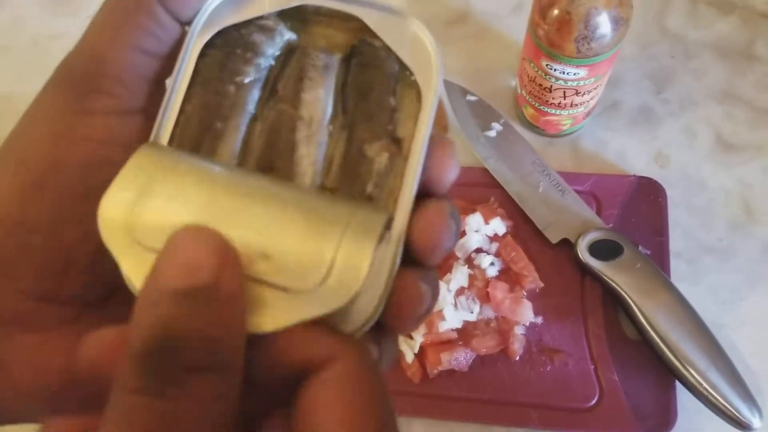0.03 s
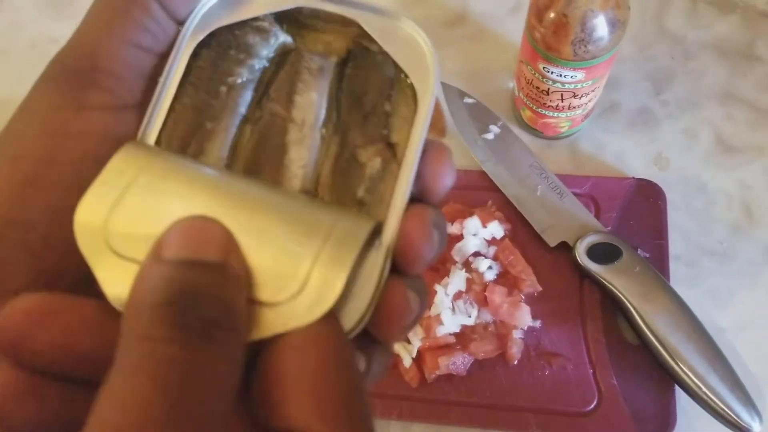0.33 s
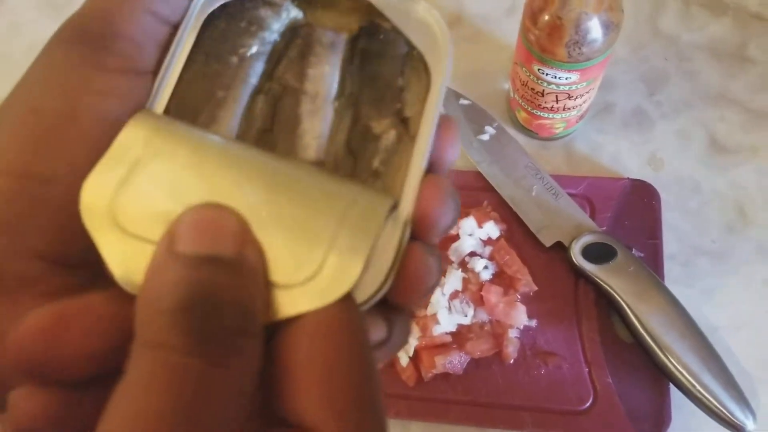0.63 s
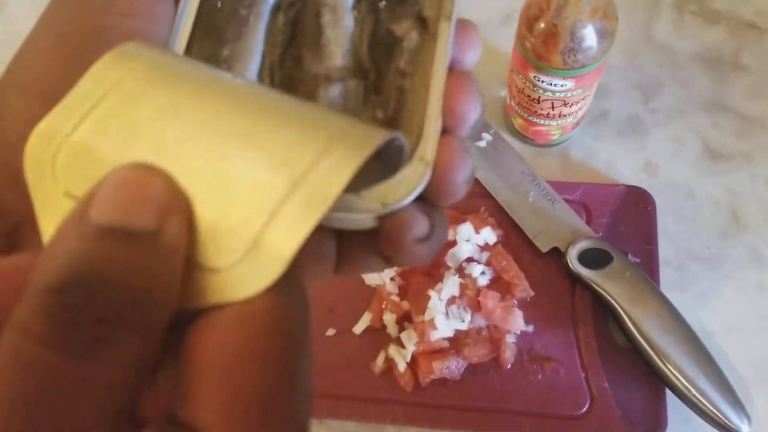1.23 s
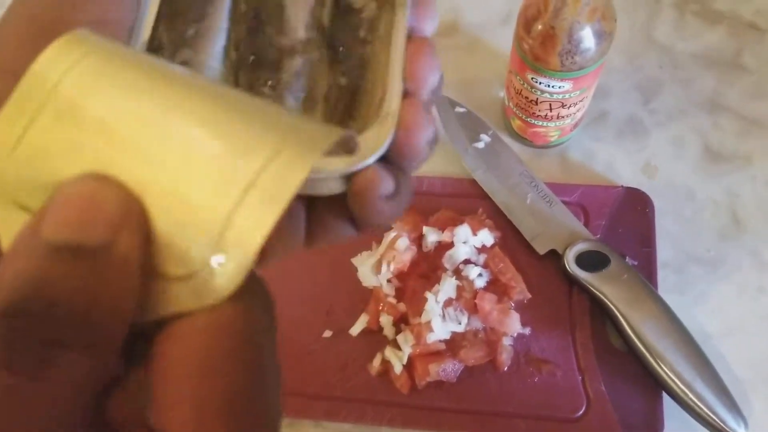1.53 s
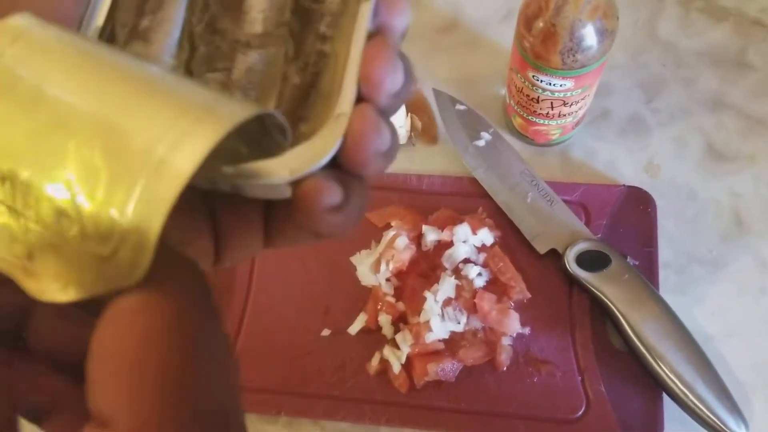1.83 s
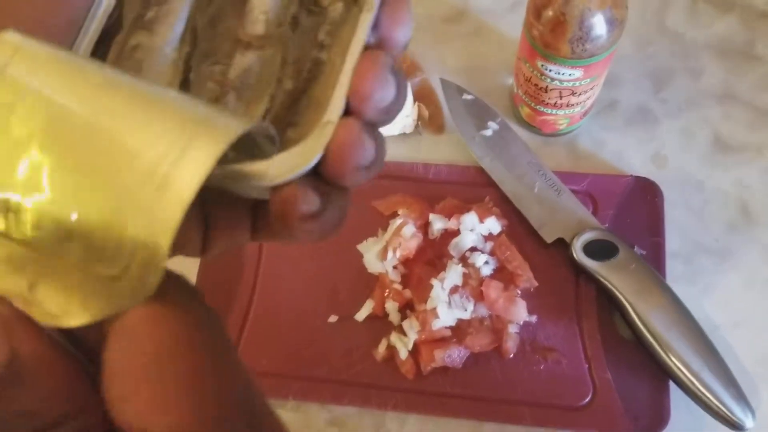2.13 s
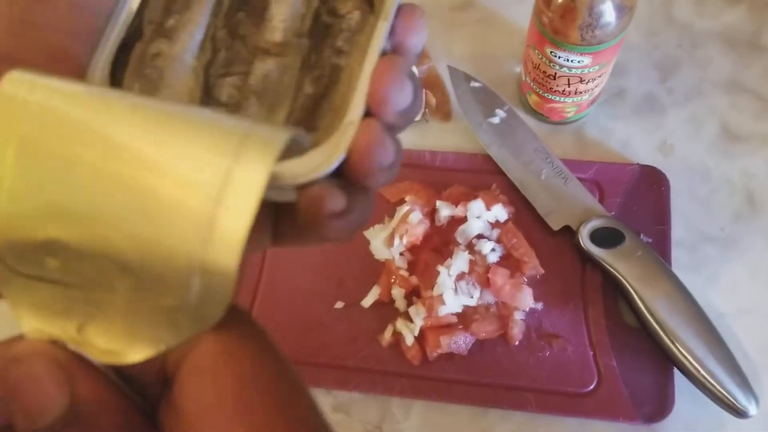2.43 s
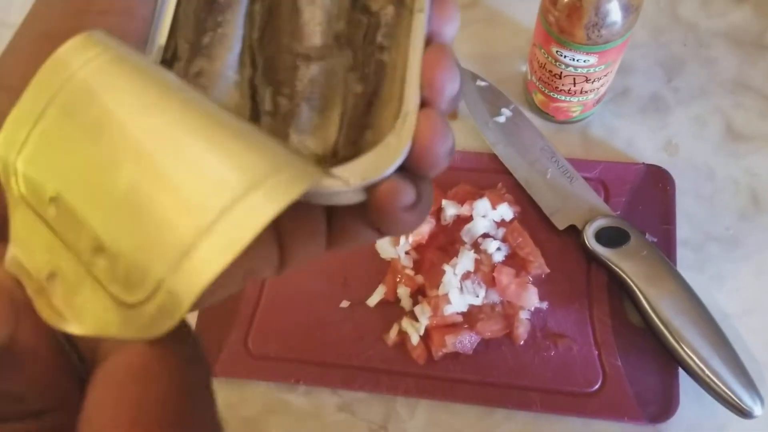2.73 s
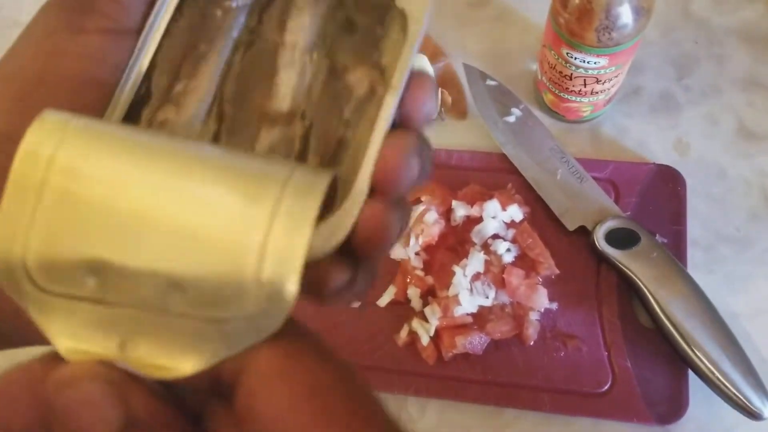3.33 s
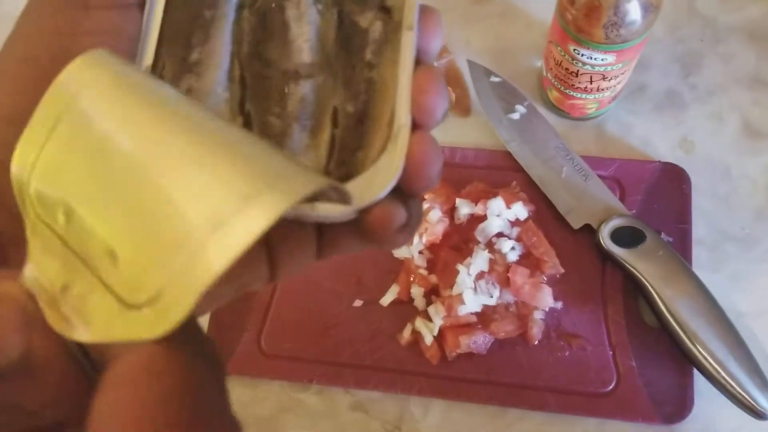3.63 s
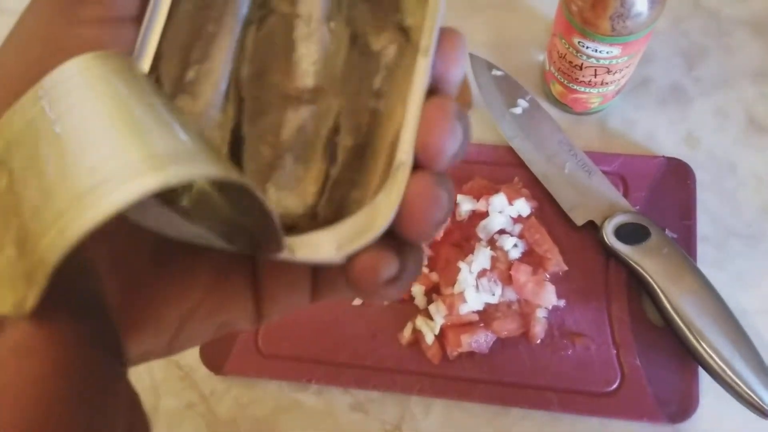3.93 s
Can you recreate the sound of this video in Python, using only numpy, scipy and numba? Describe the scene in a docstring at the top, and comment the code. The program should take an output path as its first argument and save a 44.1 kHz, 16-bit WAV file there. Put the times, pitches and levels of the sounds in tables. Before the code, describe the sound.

A thin metal lid is peeled off a fish tin, close up. After a soft finger slide, it tears with a short ringing crackle at about 0.8 seconds and again, more softly, at 1.3. Light metal ticks, finger rubs and dull hand bumps follow. A last rip at 3.7 seconds ends in a sharp snap, and the lid rings briefly. An appliance hums faintly in the quiet kitchen throughout.

```python
"""The thin lid of a fish tin is peeled back by hand, close up in a quiet kitchen.
Each of three pulls rips the scored seam in a run of tiny fractures that ring the curling lid.
The sheet ticks between pulls; the last bridge of metal snaps and leaves the lid ringing.
Fingers slide on the metal and hands bump the tin. Behind it, an appliance hums over soft room air."""
import sys
import numpy as np
from scipy import signal
from scipy.fft import rfft, irfft
from scipy.io import wavfile
from scipy.ndimage import uniform_filter1d
from numba import njit

SR = 44100
rng = np.random.default_rng(int(sys.argv[2]) if len(sys.argv) > 2 else 0)


def store_wav(level_fs):
    """Save 16-bit WAV to argv[1]."""
    pcm = np.round(np.clip(np.atleast_2d(level_fs), -1, 1) * 32767)
    wavfile.write(sys.argv[1], SR, pcm.T.astype(np.int16))


N = 176400
T = np.arange(N) / SR

# Automation, one table a pull: t/s, lid ring level/dB, lower f/Hz, upper f/Hz and top f/Hz of the
# lid's resonances, seam rasp level/dB, treble fizz level/dB
PULL_CURVES = [
    [(.795, -46, 1000, 1930, 6400, -52, -85), (.805, -28, 1050, 1990, 6600, -35.5, -57),
     (.811, -41, 1080, 2030, 5330, -33.5, -34.5), (.823, -32, 1430, 2000, 3910, -28.5, -54),
     (.84, -28.5, 1490, 1890, 3500, -34.5, -51), (.862, -27.5, 1830, 2100, 3500, -39.5, -47.5),
     (.876, -26, 1940, 2810, 4100, -35.5, -52), (.886, -26.5, 2120, 2590, 4100, -46, -52),
     (.9, -34, 2120, 2490, 4070, -62, -68)],
    [(1.288, -54, 1860, 2150, 3740, -61, -87), (1.301, -32, 1870, 2200, 3600, -48.5, -78),
     (1.306, -34, 1824, 2260, 3570, -40, -80), (1.325, -34.5, 1900, 2210, 3520, -45.5, -62),
     (1.352, -38, 1810, 2260, 3370, -44, -62), (1.374, -37, 1864, 2010, 3350, -48, -74),
     (1.395, -52, 1900, 2130, 3340, -62, -85)],
    [(3.712, -71.5, 1840, 2160, 3820, -60, -82), (3.728, -39.5, 1850, 2130, 3690, -47, -63),
     (3.748, -48, 1910, 2180, 3800, -55, -64), (3.76, -35, 1990, 2190, 3920, -46, -60),
     (3.781, -48, 1890, 2270, 3940, -43, -61), (3.79, -31, 1680, 2150, 3360, -43.5, -56),
     (3.815, -57, 1600, 2060, 3940, -48, -67), (3.832, -47, 1550, 2130, 4040, -39.5, -50)],
]
# EQ of the seam's rasp: f/Hz, level/dB
RASP_EQ = [(120, -32.5), (300, 1), (780, -0.5), (1100, 5.5), (1500, 5.5), (2000, 0), (3000, 0.5),
           (3700, -4), (5200, -11.5), (6400, -11.5), (7600, -10), (9500, -24.5), (16000, -21)]
# EQ of the treble fizz: f/Hz, level/dB
FIZZ_EQ = [(2500, -40), (5000, -17), (7500, 17), (9500, 19), (12500, 18.5), (16000, 13.5)]
# Ticks and cracks of the sheet: t/s, body level/dB, treble level/dB, decay/s, pan (left minus right)/dB
CRACK_HITS = [(1.3029, -53, -74, 0.0018, 11), (1.427, -78, -70, .001, 2), (1.587, -67, -75, .001, 4),
              (1.6091, -45, -63, 0.00061, 8.5), (1.629, -38, -49, 0.0026, 5.5),
              (2.289, -66, -88, 0.0016, 15), (2.303, -62, -79, 0.0024, 3), (2.583, -69, -74, .001, -4),
              (3.2593, -41, -69, 0.00073, 14.5), (3.2614, -37.5, -68, 0.0097, -4),
              (3.587, -51.5, -83, 0.0085, 1), (3.7252, -41.5, -50.5, 0.00092, 12),
              (3.7544, -25.5, -32.5, 0.00017, 5), (3.7692, -35.5, -48, 0.00053, 6),
              (3.8032, -31, -41, 0.00059, 0), (3.8117, -35, -37.5, 0.0028, 0),
              (3.8222, -32.5, -38, 0.00079, 6)]
# EQ of a tick's body: f/Hz, level/dB
TICK_EQ = [(150, -25), (400, -14.5), (800, -6.5), (1120, -5.5), (1700, 2), (2500, 2.5), (3100, -6.5),
           (3900, 0.5), (5500, -14), (8000, -21.5), (16000, -28)]
# Modes of the lid while the tin holds it: f/Hz, level/dB, t60/s
HELD_LID_MODES = [(1337, 6, 0.072), (1530, 1, 0.077), (1810, 9, 0.11), (1950, 9.5, 0.067), (2124, 13, 0.12),
                  (2440, 5, .08), (2740, -5, 0.042), (2925, -5, .07), (3380, -8, .06), (3770, 2, 0.069),
                  (3940, -8, .06), (4380, -14, .1), (5670, -3, 0.058)]
# Breaks of the last bridge: t/s, level/dB, decay/s
SNAP_HITS = [(3.8298, -28, 0.0023), (3.8338, -27, 0.0011), (3.8346, -22, .0018)]
# EQ of the snap: f/Hz, level/dB
SNAP_EQ = [(150, -3), (500, -4), (800, -4), (1120, -7), (1550, 0.5), (2200, 1.5), (3100, 6.5), (4600, 1),
           (5800, 4.5), (7500, 2), (9500, -4), (12000, 1.5), (16000, -6.5)]
# Modes of the freed lid: f/Hz, level/dB, t60/s
FREE_LID_MODES = [(1538, 14, 0.11), (1873, -6, 0.25), (3080, -2, .2), (3090, 10, .2), (3210, -3, .28),
                  (3940, -6, 0.12), (4060, -15, .3), (5700, -10, .28), (7300, -8, 0.12), (8450, -9, 0.11),
                  (9000, -10, .12), (10000, -8, 0.21), (11400, -6, .14), (13400, -14, .17)]
# Finger slides: t/s, half length/s, level/dB, centre f/Hz, width/Hz, hiss level/dB
FINGER_SLIDES = [(0.01, 0.032, -58, 1990, 2930, -66), (0.069, 0.042, -53.5, 1520, 1790, -66),
                 (0.973, 0.052, -76, 3000, 4000, -68), (1.643, 0.028, -58, 1890, 1600, -67),
                 (1.71, .025, -69.5, 2800, 4000, -66.5), (2.301, 0.018, -57, 1460, 980, -90),
                 (2.307, 0.0033, -57.5, 4520, 298, -90)]
# Hand bumps on the tin: t/s, half length/s, level/dB
HAND_THUDS = [(1.399, 0.019, -40), (1.95, 0.05, -44.5), (3.01, 0.013, -39.5)]
# Partials of the appliance: f/Hz, level/dB
HUM_PARTIALS = [(51.7, -53.5), (119.6, -52), (235, -63.5), (308.5, -59.5), (481, -68.5)]
# EQ of the room air: f/Hz, level/dB
AIR_EQ = [(20, -9.5), (35, -7.5), (55, 2), (80, -2.5), (105, 5.5), (150, -11), (190, -7), (235, -4.5),
          (320, -4), (400, -10), (680, -18.5), (830, -17), (1200, -22), (1700, -26.5), (2170, -28),
          (2380, -41), (2800, -41), (3500, -41), (4100, -48.5), (16000, -50)]
# Slow fader ride on the air: t/s, level/dB
AIR_RIDE = [(0, 0), (1.3, .5), (2.4, -2), (3.5, -.5)]

FRACTURES_PER_S, FRACTURE_JITTER, FRACTURE_SPREAD_DB = 1100, .4, 5
LOWER_WIDTH_HZ, UPPER_WIDTH_HZ, TOP_WIDTH_HZ = 76, 80, 94
LID_DB, TOP_RING_DB, HELD_RING_DB, FREE_RING_DB = -3.5, -7.5, -2, -9.5
PULL_PAN_DB, FIZZ_PAN_DB, SNAP_PAN_DB = 2.5, 1.5, 3.5
HUM_WAVER_DB, HUM_DRIFT_RAD = 2.5, .41
AIR_DB, AIR_SWELL_DB, AIR_WIDE_HZ = -49, 1.52, 520
NEAR_DB, NEAR_DECAY_S, RIGHT_LAG_S = 5.5, .0032, .0003
ROOM_DB, ROOM_T60_S, ROOM_TREBLE_DB, ROOM_TREBLE_T60_S = -6.5, .32, -7.5, .19


def tearing():
    """Fractures run along the seam and ring the lid, whose resonances shift as it curls."""
    breaks = stereo(np.array([fractures() for _ in range(3)]))
    times, _, *pitches, _, _ = np.concatenate(PULL_CURVES).T
    lower_hz, upper_hz, top_hz = (np.interp(T, times, hz) for hz in pitches)
    push = rasp = fizz = 0
    for pull in PULL_CURVES:
        at, ring_db, _, _, _, rasp_db, fizz_db = np.array(pull).T
        rip = breaks * (T > at[0]) * (T < at[-1])
        push += rip * undb(np.interp(T, at, ring_db))
        rasp += rip * undb(np.interp(T, at, rasp_db))
        fizz += rip * undb(np.interp(T, at, fizz_db))
    lid = resonate(push, lower_hz, LOWER_WIDTH_HZ) - resonate(push, upper_hz, UPPER_WIDTH_HZ)
    lid = undb(LID_DB) * butter(lid, "band", hz=(510, 2840))
    seam = eq(rasp, RASP_EQ) + undb(TOP_RING_DB) * resonate(rasp, top_hz, TOP_WIDTH_HZ)
    return pan(lid + seam, PULL_PAN_DB) + pan(eq(fizz, FIZZ_EQ), FIZZ_PAN_DB)


def fractures(count=16000):
    """Scored metal gives way in an uneven crackle of tiny breaks, levelled to a steady power."""
    gaps, sizes, signs = rng.standard_normal((count, 3)).T
    at = (np.cumsum(np.exp(FRACTURE_JITTER * gaps)) * SR / FRACTURES_PER_S).astype(int)
    clicks = np.sign(signs) * undb(FRACTURE_SPREAD_DB * sizes)
    crackle = np.bincount(at[at < N], clicks[at < N], N)
    power = np.abs(uniform_filter1d(crackle ** 2, size=600))
    return crackle / np.sqrt(power + 1e-12)


def cracks():
    """Single slips of the seam and buckles of the sheet ring the held lid."""
    body = treble = 0
    for at, body_db, treble_db, decay, pan_db in CRACK_HITS:
        hit = pan(slip(at, decay), pan_db)
        body += undb(body_db) * hit
        treble += undb(treble_db) * hit
    return eq(body, TICK_EQ) + undb(HELD_RING_DB) * ring(body, HELD_LID_MODES) + eq(treble, FIZZ_EQ)


def snap():
    """The last bridge breaks and the freed lid rings out."""
    hit = sum(undb(db) * slip(at, decay) for at, db, decay in SNAP_HITS)
    return pan(eq(hit, SNAP_EQ) + undb(FREE_RING_DB) * ring(hit, FREE_LID_MODES), SNAP_PAN_DB)


def slip(at, decay, size=1500):
    """Metal slips in a sharp noise transient, with the energy of 5 ms at an rms of one."""
    burst = stereo(rng.standard_normal((3, size))) * np.exp(-T[:size] / decay)
    track = np.zeros((2, N + size))
    start = int(at * SR)
    track[:, start:start + size] = unit_energy(burst)
    return track[:, :N] * np.sqrt(.005 * SR)


def ring(hit, modes):
    """A hit sets the lid's modes ringing as decaying sines."""
    t = T[:SR // 2]
    response = sum(undb(db) * np.sin(2 * np.pi * hz * t) * undb(-60 * t / t60) for hz, db, t60 in modes)
    return convolve(hit, unit_energy(response))


def slides():
    """Fingers shift their grip: soft swells of grainy friction."""
    grain = stereo(rng.standard_normal((3, N))) * undb(2.04 * wander(300))
    track = 0
    for at, half, db, hz, width, hiss_db in FINGER_SLIDES:
        rub = grain * swell(at, half)
        track += undb(db) * resonate(rub, hz, width) + undb(hiss_db) * rub
    return track


def thuds():
    """The hands jolt the tin with a dull bump as their grip gives and shifts."""
    envelope = sum(undb(db) * swell(at, half) for at, half, db in HAND_THUDS)
    bump = resonate(envelope * rng.standard_normal(N), hz=98, width=26)
    return butter(bump, "low", hz=400)


def room_tone():
    """A wavering appliance hum over a soft bed of air that narrows toward mono in the bass."""
    air = eq(rng.standard_normal((2, N)), AIR_EQ)
    ride_db = np.interp(T, *np.array(AIR_RIDE).T)
    mid, side = air * undb(AIR_DB + AIR_SWELL_DB * wander(6.13) + ride_db)
    side = butter(side, "high", AIR_WIDE_HZ, order=1)
    hum = 0
    for hz, db in HUM_PARTIALS:
        peak = np.sqrt(2) * undb(db + HUM_WAVER_DB * wander(6.89))
        hum += peak * np.sin(2 * np.pi * hz * T + HUM_DRIFT_RAD * wander(4.93))
    return pan(np.array([mid + side, mid - side]) + hum, db=.2)


def kitchen(x):
    """Direct sound, early reflections off tin, hands and worktop, then a short room tail."""
    t = T[:SR * 3 // 4]
    near, low, high = rng.standard_normal((3, 2, len(t)))
    response = undb(NEAR_DB) * unit_energy(near * np.exp(-t / NEAR_DECAY_S))
    response[0, 0] += 1  # the direct sound reaches the left first
    response[1, int(RIGHT_LAG_S * SR)] += 1
    bloom = 1 - np.exp(-t / .012)
    low_tail = unit_energy(low * bloom * undb(-60 * t / ROOM_T60_S))
    high_tail = unit_energy(high * bloom * undb(-60 * t / ROOM_TREBLE_T60_S))
    response += undb(ROOM_DB) * butter(low_tail, "low", hz=6000)
    response += undb(ROOM_TREBLE_DB) * butter(high_tail, "high", hz=6000)
    return convolve(x, flatten(response))


def undb(db):
    """Decibels to gain."""
    return 10 ** (np.asarray(db) / 20)


def unit_energy(x):
    """Scale each channel to an energy of one."""
    return x / np.sqrt(np.sum(x ** 2, axis=-1, keepdims=True))


def swell(at, half):
    """Bell-shaped envelope."""
    return np.exp(-((T - at) / half) ** 2)


def wander(rate_hz):
    """Smooth random modulation with an rms of one."""
    hold = int(SR / rate_hz)
    steps = np.repeat(rng.standard_normal(N // hold + 1), hold)
    curve = uniform_filter1d(uniform_filter1d(steps, hold), hold)[:N]
    return curve / np.sqrt(np.mean(curve ** 2))


def stereo(x, centre_share=.47):
    """Spread three unrelated signals to centre, left and right; the share is one of power."""
    return np.sqrt(centre_share) * x[0] + np.sqrt(1 - centre_share) * x[1:]


def pan(x, db):
    """Tip the balance; positive is left."""
    return x * undb(np.array([[db], [-db]]) / 2)


def convolve(x, response):
    """Play a sound through an impulse response."""
    return signal.fftconvolve(np.atleast_2d(x), np.atleast_2d(response), axes=-1)[:, :N]


def butter(x, kind, hz, order=2):
    """Gentle low-, high- or band-pass."""
    return signal.sosfilt(signal.butter(order, hz, kind, fs=SR, output="sos"), x)


def eq(x, curve, size=8192):
    """Shape a sound with an EQ curve; white noise keeps its power."""
    hz, db = np.array(curve).T
    bins_hz = np.maximum(np.arange(size // 2 + 1) * SR / size, 1)
    gain = undb(np.interp(np.log(bins_hz), np.log(hz), db))
    return convolve(x, unit_energy(irfft(minimum_phase(gain))))


def resonate(x, hz, width):
    """A fixed or gliding resonance on each channel; white noise keeps its power."""
    bands = [swept_band(channel + 1e-18, hz * np.ones(N), width) for channel in np.atleast_2d(x)]
    return np.array(bands) * np.sqrt(SR / (np.pi * width))


@njit
def swept_band(x, hz, width):
    """State-variable band-pass, retuned every sample."""
    y, band_state, low_state = np.empty(len(x)), 0., 0.
    for i in range(len(x)):
        tuning, damping = np.tan(np.pi * hz[i] / SR), width / hz[i]
        band = (band_state + tuning * (x[i] - low_state)) / (1 + tuning * (tuning + damping))
        band_state = 2 * band - band_state
        low_state += 2 * tuning * band
        y[i] = damping * band
    return y


def minimum_phase(gain):
    """Spectrum with the given gains and no pre-ring."""
    cepstrum = irfft(np.log(gain))
    half = cepstrum.shape[-1] // 2
    cepstrum[..., 1:half] *= 2
    cepstrum[..., half + 1:] = 0
    return np.exp(rfft(cepstrum))


def flatten(response, size=65536):
    """Bring a response's broad colour to unity gain and keep its fine ripple."""
    spectrum = rfft(response, size)
    broad = np.sqrt(uniform_filter1d(np.abs(spectrum) ** 2, size=700))
    return irfft(spectrum * minimum_phase(1 / broad))[:, :response.shape[1]]


def scene():
    """Metal and fingers go through the kitchen reverb; thuds and room tone stay dry."""
    return kitchen(tearing() + cracks() + snap() + slides()) + thuds() + room_tone()


def record(dry):
    """A steep high cut at 16 kHz on the mix."""
    return signal.sosfilt(signal.ellip(10, .2, 80, 16000, fs=SR, output="sos"), dry)


dry = scene()
out = record(dry)
store_wav(out)
```